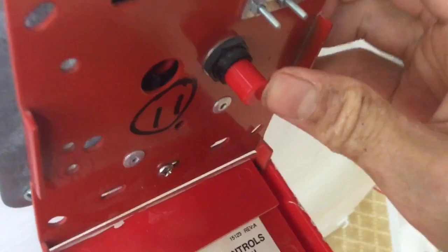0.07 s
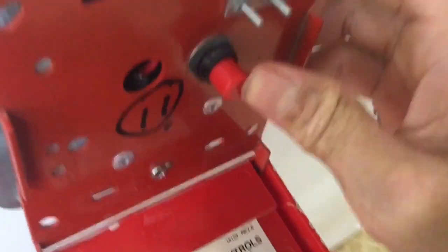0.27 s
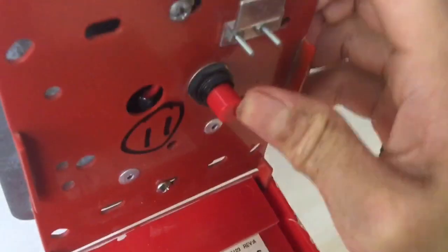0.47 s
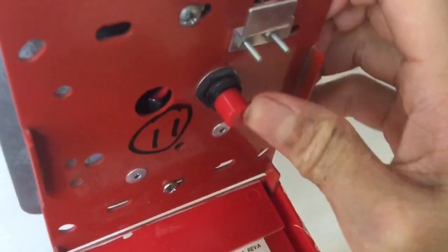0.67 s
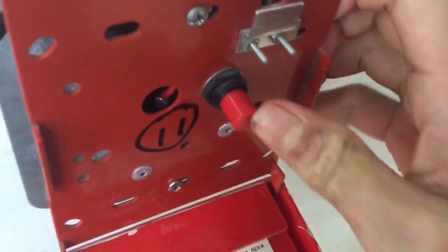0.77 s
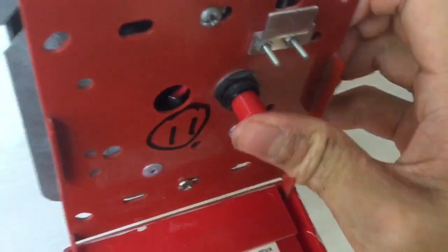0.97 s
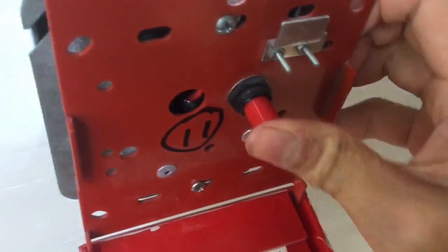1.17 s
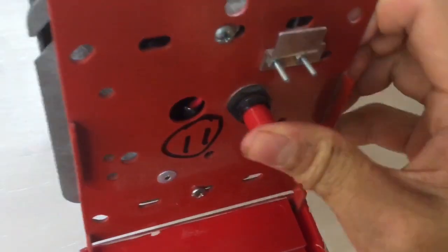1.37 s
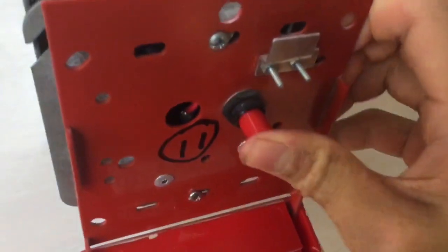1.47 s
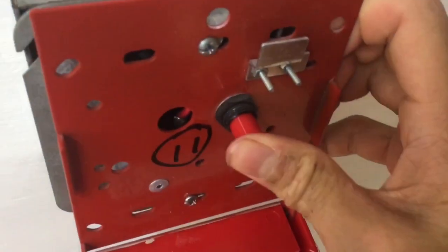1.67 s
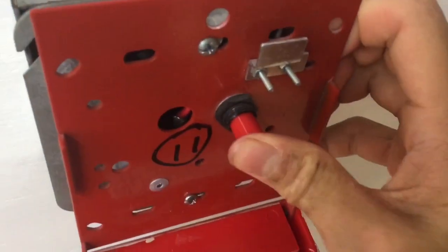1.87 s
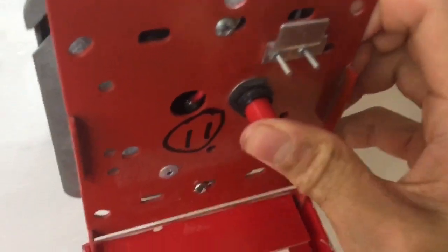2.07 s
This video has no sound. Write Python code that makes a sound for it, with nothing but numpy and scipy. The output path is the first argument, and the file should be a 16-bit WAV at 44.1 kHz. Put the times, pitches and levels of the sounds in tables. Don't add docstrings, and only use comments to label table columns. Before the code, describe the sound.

Fast crisp clicking of a spring-loaded button, darker going in, brighter coming out, in a quiet room.

```python
import sys
import numpy as np
from scipy import signal
from scipy.fft import rfft, irfft
from scipy.io import wavfile

SR = 44100
rng = np.random.default_rng(int(sys.argv[2]) if len(sys.argv) > 2 else 0)


def log_audio(samples):
    frames = np.atleast_2d(samples).T
    limited = np.clip(frames, -1, 1)
    pcm = np.round(limited * 32767).astype(np.int16)
    wavfile.write(sys.argv[1], SR, pcm)


def level_to_linear(level):
    exponent = np.asarray(level, float) / 20
    return 10 ** exponent


N = 94021
LEAD_S = 0.0013


def rms_one(x):
    return x / np.sqrt(np.mean(x ** 2) + 1e-20)


def at_hz(points, hz):
    points = np.array(points)
    return np.interp(np.log(hz), np.log(points[:, 0]), points[:, 1])


def filtered(x, order, hz, kind):
    return signal.sosfilt(signal.butter(order, hz, kind, fs=SR, output="sos"), x)


def ring(x, hz, t60):
    r = level_to_linear(-60 / (t60 * SR))
    w = 2 * np.pi * hz / SR
    return signal.lfilter([0, np.sin(w)], [1, -2 * r * np.cos(w), r * r], x + 1e-18)


def narrow(hz, width_hz, db):
    t60 = np.log(1000) / np.pi / width_hz
    once = ring(rng.standard_normal(N), hz, t60)
    return level_to_linear(db) * rms_one(ring(once, hz, t60))


def bands(low_hz, size):
    edges = np.geomspace(low_hz, 17500, 24)
    white = rng.standard_normal((2, size))
    for k, (low, high) in enumerate(zip(edges, edges[1:])):
        yield np.sqrt(low * high), filtered(white[k % 2], 2, [low, high], "band")


def dying_noise(t60s, spectrum, low_hz, size):
    t = np.arange(size) / SR
    out = np.zeros(size)
    for hz, band in bands(low_hz, size):
        out += level_to_linear(at_hz(spectrum, hz) - 60 * t / at_hz(t60s, hz)) * band
    return out / np.sqrt(np.sum(out ** 2))


# (frequency [Hz], level [dB per Hz])
FLOOR = [(30, -4.5), (60, 11), (400, 3), (480, -28), (760, -50), (850, -18.5), (2000, -24.5),
         (16500, -32.5)]


def hush():
    hz = np.arange(N // 2 + 1) * SR / N + 1
    return level_to_linear(-61.5) * rms_one(irfft(rfft(rng.standard_normal(N)) * level_to_linear(at_hz(FLOOR, hz)), N))


# (time [s], level [dB])
HANDLING = [
    (0.0, -83),
    (0.16, -61.5),
    (0.4, -61.5),
    (0.94, -66),
    (1.46, -55),
    (1.61, -59.5),
    (1.84, -80),
    (1.99, -59.5),
    (2.13, -58.5),
]


def handling():
    creak = rms_one(filtered(rng.standard_normal(N), 4, [50, 350], "band"))
    s, db = np.transpose(HANDLING)
    return level_to_linear(np.interp(np.arange(N) / SR, s, db) + 4.5) * creak


def electrics():
    hum = narrow(60.2, width_hz=3.2, db=-64.5) + narrow(125, width_hz=3.2, db=-64.5)
    return hum + narrow(7500, width_hz=300, db=-89) + narrow(690, width_hz=150, db=-67)


# (frequency [Hz], t60 [s])
ROOM_T60 = [(300, 0.45), (3000, 0.3), (8000, 0.34), (16000, 0.14)]


def room(x):
    colour = [(100, 6.7), (2800, 5.0), (6000, -2.5), (8000, -2.5), (17000, 0.5)]  # (Hz, dB per Hz)
    tail = dying_noise(ROOM_T60, colour, low_hz=544, size=20000)
    tail = tail * (1 - np.exp(-np.arange(len(tail)) / SR / 0.0035))
    return level_to_linear(-43.5) * 10 * signal.fftconvolve(x, tail)[:N]


# (time [s], length [s], level [dB], brightness [dB per octave])
RUBS = [(0.182, 0.022, -61.5, 1), (0.497, 0.003, -66, 7), (0.509, 0.0025, -66, 7), (0.687, 0.003, -66, 7),
        (0.292, 0.024, -70, 7), (0.378, 0.021, -63.5, -21), (0.855, 0.0088, -70.5, 1),
        (0.884, 0.011, -69, 4.5), (0.939, 0.0083, -63, 3), (1.075, 0.01, -59.5, 4),
        (1.703, 0.011, -63, -0.5), (1.726, 0.018, -63.5, 3), (1.767, 0.0083, -60.5, 2),
        (1.78, 0.0062, -63, 4)]
# (frequency [Hz], level [dB per Hz])
TOUCH_CRACK = [(240, -2.5), (400, 3), (1780, 1), (4000, -7.5), (6290, -17.5), (11500, -16), (14800, -42.5),
               (16500, -30)]


def rubs():
    out = np.zeros(N)
    for s, length, db, bright_db in RUBS:
        size = int(2 * length * SR)
        colour = [(f, d + bright_db * np.log2(f / 4000)) for f, d in TOUCH_CRACK]
        hiss = rms_one(sum(level_to_linear(at_hz(colour, hz)) * band for hz, band in bands(370, size)))
        start = int((s - length) * SR)
        out[start:start + size] += level_to_linear(db) * hiss * np.hanning(size)
    return out


PHASE_SPREAD = 1.8


def struck(hzs, dbs, t60s, rise_s, size, habit):
    t = np.arange(size) / SR
    hz, db, t60 = (np.array(v)[:, None] for v in (hzs, dbs, t60s))
    free = np.where(hz < 1500, 0.6, np.where(hz < 6500, 0.3, 1.3))
    phase_luck, detune_luck, twin_phase, level_luck = rng.standard_normal((4, len(hz), 1))
    phase = PHASE_SPREAD * (habit[:len(hz)] + free * phase_luck)
    wave = np.cos(2 * np.pi * hz * (t - LEAD_S) + phase)
    twin_hz = hz * (1 + 0.02 * detune_luck)
    wave = wave + free * level_to_linear(-6.5) * np.cos(2 * np.pi * (twin_hz * t + twin_phase))
    level = level_to_linear(db + 1.2 * (1 + free) * level_luck - 60 * t / t60)
    return (1 - np.exp(-t / rise_s)) ** 2 * np.sum(level * wave, axis=0)


# (frequency [Hz], t60 [s])
CRACK_T60 = [(700, 0.082), (3000, 0.047), (8000, 0.047), (16000, 0.0063)]


def contact_crack(spectrum, haste, rise_s, size):
    t60s = [(f, t60 / haste) for f, t60 in CRACK_T60]
    burst = dying_noise(t60s, spectrum, 360.3, size // 2)
    burst = np.pad(burst, (0, size))[:size]
    return burst * (1 - np.exp(-np.arange(size) / SR / rise_s)) ** 2


PANEL_HZ = [95, 150, 286, 382, 690, 1060, 1192, 1440, 1750, 2120, 2330]
HOUSING_HZ = [2630, 2905, 3243, 3499, 3736, 4107, 4380, 4600, 4850, 5090, 5690, 6115, 7030, 7450]
SPRING_HZ = [7821, 8200, 8950, 9210, 10230, 10900, 11300, 11640, 12330, 12960, 13545, 14130, 14670, 15060]
CAP_HZ = [4635, 5350, 5525, 6350, 6780, 7084, 8800, 9410, 9802, 11200, 11640, 12020, 15400, 15700]
WALL_HZ = [1270, 2115, 2255, 2660, 2917, 3283, 5600, 5673, 6029, 8950, 9250, 10790, 12360, 12979]
# (level going in [dB], level coming out [dB], t60 [s])
PANEL = [(-9.5, -7.5, 0.069), (-1.5, -3.5, 0.083), (-1.5, -3, 0.096), (-6.5, -8, 0.077),
         (-15.5, -12.5, 0.044), (1, 2, 0.018), (0, 2.5, 0.046), (-13.5, -9.5, 0.099), (-6, -2.5, 0.028),
         (-29, -5.5, 0.042), (-0.5, -21, 0.016)]
HOUSING = [(-10.5, -29.5, 0.05), (-1.5, -48, 0.023), (-15, -37.5, 0.075), (5.5, -12, 0.018),
           (-5, -15, 0.031), (-7, -5.5, 0.017), (-12, 0.5, 0.022), (-30, -25, 0.013), (-36, -8, 0.035),
           (-3.5, -9.5, 0.023), (7.5, -11.5, 0.024), (-22, -36.5, 0.042), (-36, -10, 0.037),
           (-4.5, -5.5, 0.013)]
SPRING = [(-25.5, -15.5, 0.058), (0, -2.5, 0.016), (-19, 3.5, 0.0059), (-5, -24.5, 0.035),
          (10.5, -10, 0.0076), (-6, -29, 0.022), (-29, -9, 0.012), (-24, 6.5, 0.0088), (-16, -3, 0.018),
          (-3.5, -8, 0.013), (-5, -2.5, 0.023), (-13, -9, 0.019), (-4.5, -22.5, .018), (-15.5, -9, 0.013)]
CAP = [(-21, -23, 0.0081), (-17.5, -13.5, 0.011), (7.5, -6, 0.015), (-30.5, -13.5, 0.016),
       (-24.5, -8, 0.013), (-11.5, -23.5, .02), (-14.5, -33.5, .02), (3.5, -9, 0.017), (-12.5, -25, 0.0067),
       (-18, 15, 0.0044), (2, -33.5, 0.0088), (-4.5, -18, 0.02), (-6, -11, 0.02), (-12, -17, .015)]
WALL = [(-43.5, -45, 0.45), (-62.5, -49, 0.12), (-34.5, -44, 0.19), (-31.5, -47, 0.23), (-43.5, -63, 0.57),
        (-52, -46.5, .15), (-35.5, -38, 0.13), (-29.5, -45, 0.27), (-39, -28, 0.078), (-42.5, -41.5, 0.074),
        (-46, -40.5, 0.23), (-35.5, -45, .15), (-37, -30.5, .15), (-45.5, -36.5, .12)]
# (frequency [Hz], frequency [Hz], phase apart [half turns])
PAIRS = [(5690, 5525, .6), (4380, 4850, 0)]


def snaps(events, pings, crack, linger, order, ring_db=0, crack_db=0, spike_db=0, haste=1):
    rise_s, bright_from_hz = (0.0008, 0.0007)[order], (4600, 7500)[order]
    size, long = SR // 8, SR // 4
    out = np.zeros(N + SR)
    t = np.arange(long) / SR
    hz = np.concatenate([HOUSING_HZ, SPRING_HZ, CAP_HZ])
    rows = np.concatenate([HOUSING, SPRING, CAP])
    panel_hz, panel_rows = np.array(PANEL_HZ), np.array(PANEL)
    wall_hz, wall_rows = np.array(WALL_HZ), np.array(WALL)
    habit = rng.standard_normal((len(hz), 1))
    for one_hz, other_hz, apart in PAIRS:
        habit[hz == other_hz] = habit[hz == one_hz] + apart * np.pi / PHASE_SPREAD
    click = (np.arange(size) == int(LEAD_S * SR)).astype(float)
    spike = filtered(click, 2, 3500, "high")

    for (s, db, thump_db, bright_db, knock_db), ping_db in zip(events, pings):
        def lift(f):
            shelf = bright_db / (1 + (bright_from_hz / f) ** 6)
            return shelf + ping_db * np.exp(-((f - 5600) / 500) ** 2)

        parts = struck(hz, rows[:, order] + lift(hz), rows[:, 2], rise_s, size, habit)
        walls = struck(wall_hz, wall_rows[:, order] + lift(wall_hz), wall_rows[:, 2], 0.001, long, habit)
        push_db = np.where(panel_hz < 500, thump_db, knock_db)
        panel = struck(panel_hz, panel_rows[:, order] + push_db, panel_rows[:, 2], 0.00059, size, habit)

        burst = contact_crack([(f, d + lift(f)) for f, d in crack], haste, rise_s, size)
        burst = 10 * level_to_linear(-14 + crack_db + bright_db / 2) * burst
        burst = burst + level_to_linear(-5 + spike_db + bright_db) * spike
        wash = dying_noise(ROOM_T60, [(f, d + lift(f)) for f, d in linger], 543, long)
        wash = 20 * level_to_linear(-41 + bright_db / 2) * wash * (1 - np.exp(-t / 0.006))

        ring_gain = level_to_linear(-11 + ring_db)
        start = int((s - LEAD_S) * SR)
        out[start:start + size] += level_to_linear(db) * (ring_gain * parts + level_to_linear(-25.5) * panel + burst)
        out[start:start + long] += level_to_linear(db) * (wash + ring_gain * walls)
    return out[:N]


# (time [s], peak level [dB], panel thump [dB], brightness [dB], panel knock [dB])
TOUCHES = [
    (.1438, -56, -9, 8, -9),
    (.1468, -31, 7.5, 4, 3),
    (.1487, -29, 6, -9, 8),
    (.1568, -44, -5, 6, 0),
    (.9033, -33, 12, 7, 6),
    (.9048, -31, 5, -9, 8),
    (.924, -43, -4, 1, 3),
    (1.056, -50, -5, 3, 0),
    (1.579, -34, -10, -4, -4),
]


def touches():
    return snaps(TOUCHES, np.zeros(len(TOUCHES)), TOUCH_CRACK, TOUCH_CRACK, order=1,
                 ring_db=-20, crack_db=5, spike_db=1, haste=2.2)


# (time [s], peak level [dB], panel thump [dB], brightness [dB], panel knock [dB])
RELEASES = [
    (0.3168, -7.5, -3, 2.5, -3),
    (0.5195, -6, -1, 2, -6),
    (0.6972, -5.5, -4.5, -0.5, -7),
    (1.0804, -10, -0.5, 1.5, 4),
    (1.2506, -10.5, 1.5, 1.5, 2),
    (1.4009, -10, -0.5, 1.5, -0.5),
    (1.5339, -10.5, 2, 2, -0.5),
    (1.7895, -8.5, -1.5, -1, -1.5),
    (1.9326, -6.5, -1.5, -2.5, -7.5),
    (2.0748, -7, -4.5, -0.5, 0),
]
RELEASE_PING = [3.8, 0.5, -4.5, 5.3, 4.5, 3.5, 5, 1.5, -6, -1]
# (frequency [Hz], level [dB per Hz])
RELEASE_CRACK = [(410, -41.5), (700, -20.5), (1300, -9.5), (3000, -14.5), (4400, -2.5), (7770, -16),
                 (11400, 6.5), (14600, -17.5), (16500, -26)]
RELEASE_WASH = [(530, -41), (900, -0.5), (2270, -9), (2470, -15.5), (4380, 2.5), (10000, -2.5),
                (11700, 11.5), (15500, -3.5), (16500, -30.5)]


def releases():
    return snaps(RELEASES, RELEASE_PING, RELEASE_CRACK, RELEASE_WASH, order=1)


# (time [s], peak level [dB], panel thump [dB], brightness [dB], panel knock [dB])
PRESSES = [
    (0.2038, -10, -2, -4, -5),
    (0.403, -9.5, -2, -3.5, -5.5),
    (0.6042, -11, 1, -4.5, -5),
    (0.9498, -9.5, -0.5, -4.5, -4.5),
    (1.1652, -8.5, -2.5, -6, -3),
    (1.3181, -9.5, -2, -5, -1),
    (1.4561, -9, -1, -6, -1.5),
    (1.6011, -11.5, 0, -2, -4.5),
    (1.8592, -9, -1.5, -5, -7),
    (1.9935, -10.5, -1.5, -3, -3),
]
PRESS_PING = [3, 2.8, 5.5, 2.2, 1, -2, -1.4, 1.2, -0.3, 0.1]
# (frequency [Hz], level [dB per Hz])
PRESS_CRACK = [(410, -38), (700, -30.5), (2770, 1.5), (5020, -2), (5650, 2), (6630, -25), (9100, -16),
               (15000, -3), (16500, -22)]
PRESS_WASH = [(530, -45.5), (900, -4), (1940, -24.5), (2760, 0), (4600, -26), (5650, -6.5), (7390, -24.5),
              (15200, 2.5), (16500, -39)]


def presses():
    return snaps(PRESSES, PRESS_PING, PRESS_CRACK, PRESS_WASH, order=0)


def scene():
    button = presses() + releases() + touches() + rubs()
    tail = room(button)
    background = hush() + handling() + electrics()
    return (button + tail + background)[None]


def band_limit(x):
    return signal.sosfilt(signal.butter(12, 17010, fs=SR, output="sos"), x)


def record(dry):
    mix = filtered(dry, 3, 51, "high")
    mix = filtered(mix, 16, 15630, "low")
    return band_limit(mix)


dry = scene()
out = record(dry)
log_audio(out)
```